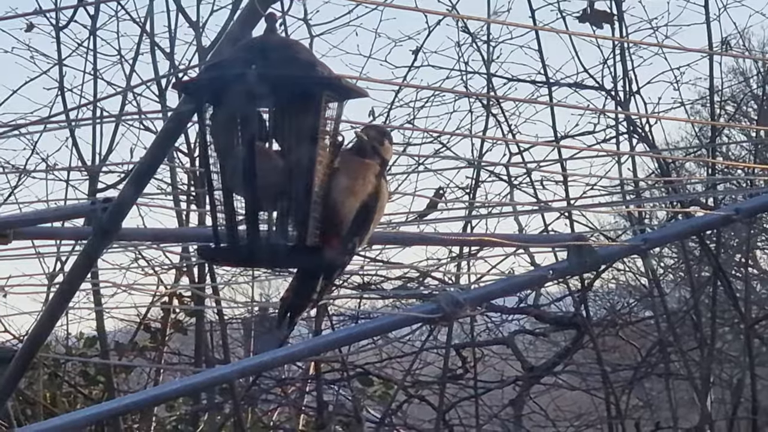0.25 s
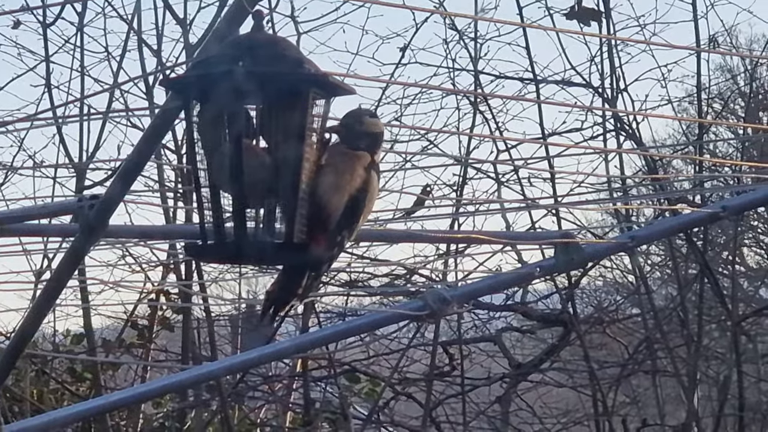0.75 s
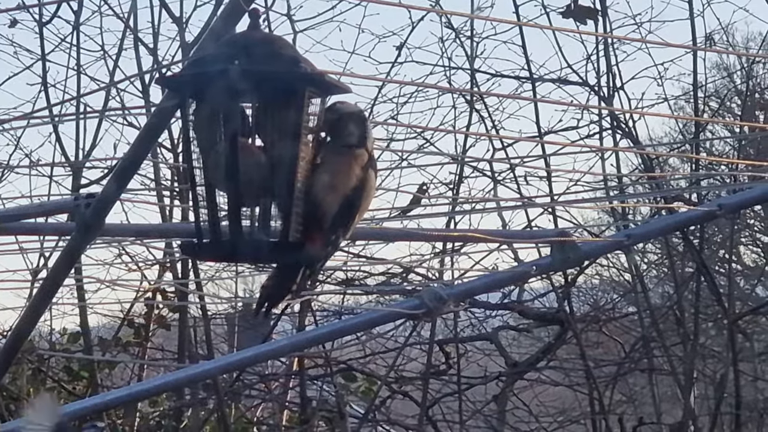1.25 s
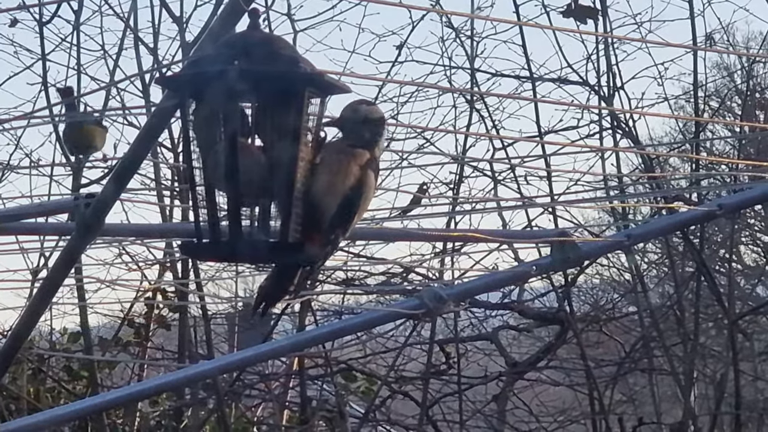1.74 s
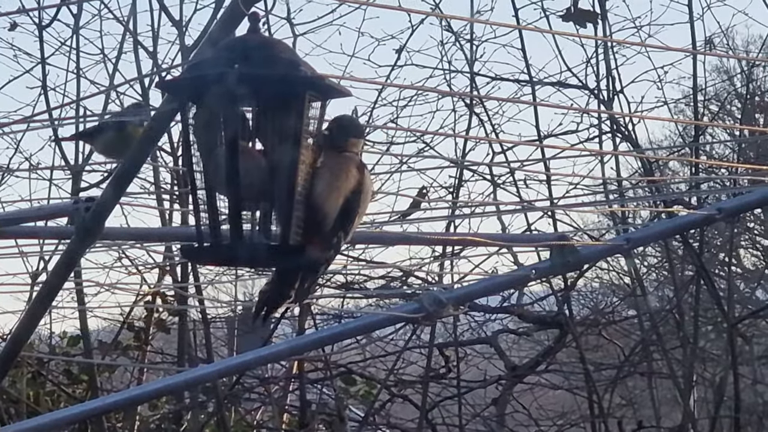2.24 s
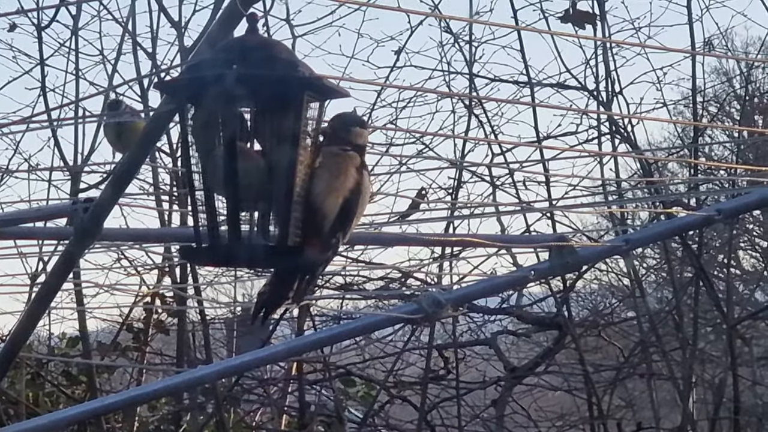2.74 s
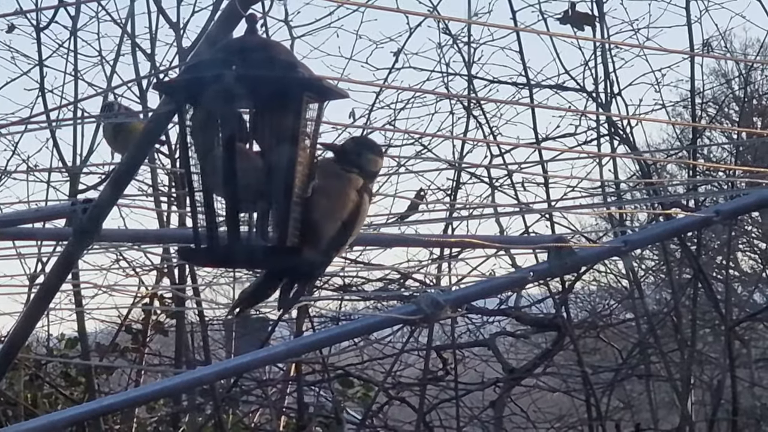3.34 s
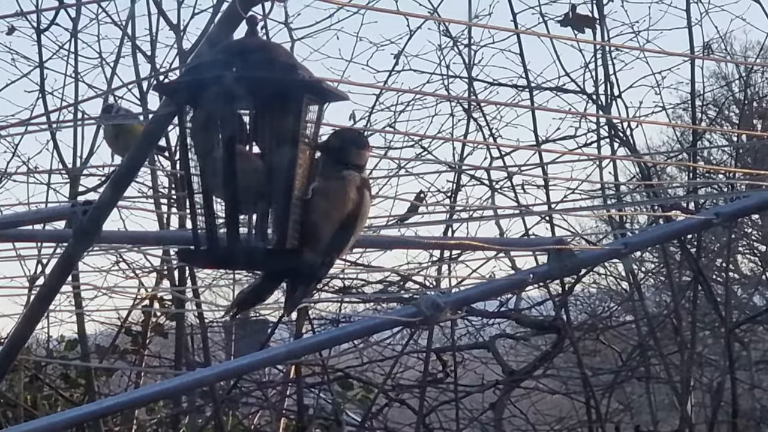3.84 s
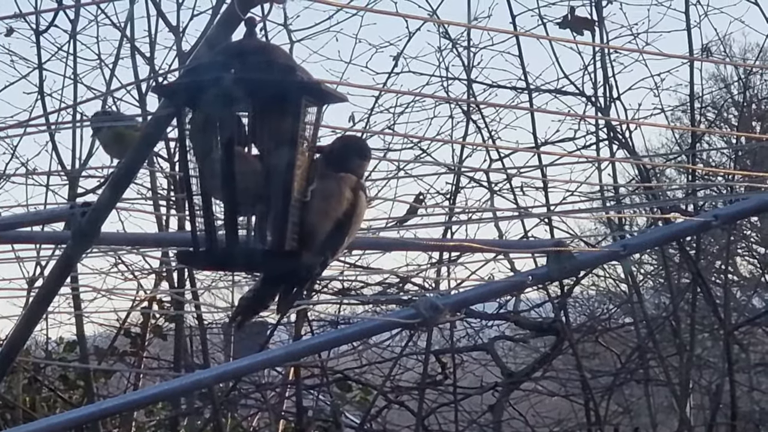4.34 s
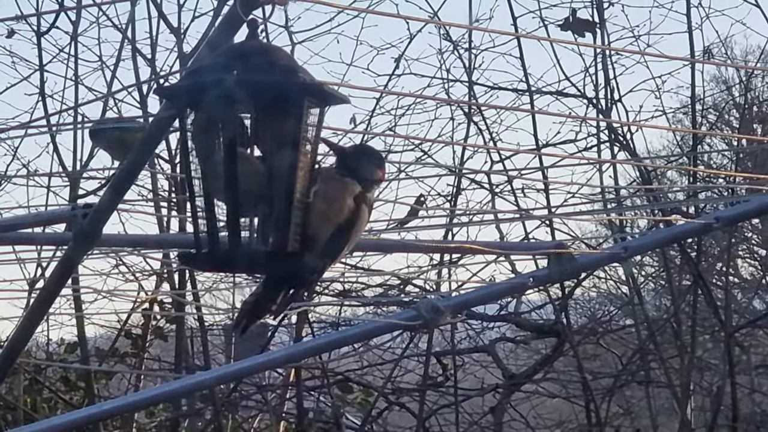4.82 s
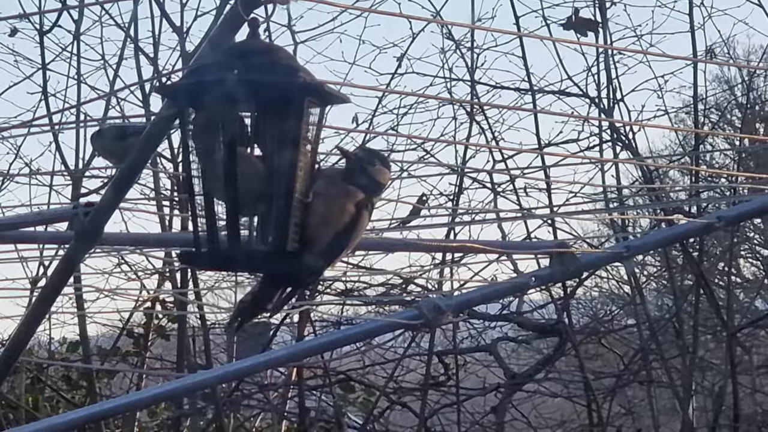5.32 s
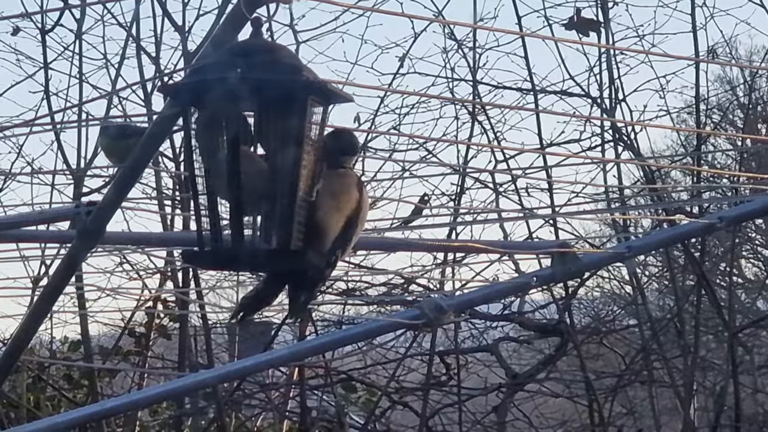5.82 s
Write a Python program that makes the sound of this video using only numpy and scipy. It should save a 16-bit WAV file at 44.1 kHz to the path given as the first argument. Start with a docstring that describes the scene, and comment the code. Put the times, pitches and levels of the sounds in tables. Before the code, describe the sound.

Close, dull pecking thumps lean strongly left, short and irregular, with little clicks and scrapes on contact. After an early burst there are scattered single blows, then a low-ringing pop and a hollow tap with a short echo. Several thuds bunch together late, and a last softer pair ends the scene. The outdoor background is a lumpy low rumble with a gentle garden wash, mostly on the right, and thin microphone hiss.

```python
"""Woodpecker at a hanging feeder

Outdoors, dull thuds reach the left microphone through the body it sits in, many with a faint tick; one pop
and one hollow knock join them. The blows ring decaying modes, and the ticks pass clicks, grains and noise
through resonances. Shaped noise makes a lumpy low rumble, the soft garden wash, mostly louder on the right,
and the hiss of the microphones; very narrow noise makes one faint whine."""
import sys
import numpy as np
from scipy import signal
from scipy.io import wavfile
from scipy.ndimage import uniform_filter1d

SR = 44100
rng = np.random.default_rng(int(sys.argv[2]) if len(sys.argv) > 2 else 0)


def store_pcm(level_fs):
    """Save levels as 16-bit WAV."""
    pcm = np.round(np.clip(level_fs, -1, 1) * 32767).astype(np.int16)
    wavfile.write(sys.argv[1], SR, np.atleast_2d(pcm).T)


N = 267863  # length [samples]

# Spectral shapes of the beds: (frequency [Hz], relative density [dB per Hz])
RUMBLE = [(8, -12.5), (20, 1.5), (55, -4.5), (88, -12.5), (150, -20.5), (270, -32), (500, -60.5)]
WASH = [(150, -25.5), (350, -6.5), (640, -1.7), (1470, -4), (2300, -7), (4700, -13), (5800, -19.5),
        (8000, -29.5), (11000, -60.5)]
MURMUR = [(150, -25.5), (300, 3), (450, -0.4), (750, -7.5), (1200, -36.5)]  # lower part of the wash
HISS = [(5000, -6.5), (9000, -17.5), (10800, -10), (11600, 2), (14500, 1), (16000, 1.5)]
# Stereo balance of the beds: (frequency [Hz], left minus right [dB])
RUMBLE_SIDES = [(20, 8.5), (50, 5), (90, 1), (200, 0)]
WASH_SIDES = [(300, 1.5), (700, -8.5), (1290, -13), (2380, -7.5), (4400, -5), (8000, 4.5)]
# Each bed starts loud and settles: (final level [dB], extra level at the start [dB], settling time [s],
# steady sag [dB per s], left minus right at the start [dB])
RUMBLE_FADE = (-59, 1.5, 4.5, 0.28, -3)
WASH_FADE = (-74.5, 7, 0.23, 0.59, 4)
MURMUR_FADE = (-84, 8.5, 0.67, 0.1, -7)
# First contacts: (time [s], low part [dB], middle part [dB], bright part [dB],
# scrape grains relative to the click [dB], contact time that rounds off the low and middle parts [s])
TICKS = [(0.8043, -60, -53, -94, 0.5, .00075), (0.87, -56, -54, -60, -3, 0.00018),
         (.913, -70, -65, -80.5, -11, 0.00034), (1.88, -59, -60, -68.5, -17, 0.00033),
         (2.257, -61, -62, -70.5, -12, 0.00033), (3.5487, -63, -58, -69, -2, .0004),
         (4.4106, -64, -49, -96, -1, 0.00061), (4.9178, -56, -45.5, -95, -2.5, 0.00068),
         (4.9799, -50.5, -63, -62, 0, 0.00039), (5.052, -56, -45.5, -83, -6, 0.00042),
         (5.8295, -54, -50, -93, -5, 0.00085)]
# Resonances, each passed twice: (frequency [Hz], width of one pass [Hz], relative gain [dB])
TICK_LOW = [(433, 970, 0)]
TICK_MIDDLE = [(1280, 2350, 0)]
TICK_BRIGHT = [(4000, 1300, 1), (5370, 980, 5.5), (6190, 600, 3), (7420, 770, 6.5), (10950, 710, -1.5),
               (13600, 3500, -9.5)]
ECHO_COLOUR = [(450, 300, -5), (1000, 700, -12), (1900, 700, 0)]
WHINE = [(5554, 14, 0)]
# Soft blows: (time [s], blow level [dB], contact time [s], share passed on to the ringing panel [0-1])
THUDS = [(0.8051, -27.5, 0.01, 0.26), (0.869, -14.5, 0.0071, 1), (0.9107, -20.5, 0.0071, 0.6),
         (.935, -31.5, 0.0093, 0), (1.7, -33, 0.01, 0), (1.829, -43.5, 0.011, .1),
         (1.879, -16.5, 0.0072, 0.67), (1.959, -33, 0.018, 0.6), (2.098, -43.5, 0.0068, 0),
         (2.257, -18, 0.0068, .76), (2.283, -31, 0.0088, 0), (2.384, -45, 0.0064, 0.3),
         (2.84, -33, 0.0077, 0.2), (3.2913, -33, 0.013, 0.1), (3.5491, -18.5, 0.007, 0.76),
         (4.4101, -27, 0.0093, 0.15), (4.464, -41.5, 0.015, 0), (4.9174, -22, 0.008, 0.1),
         (4.953, -27.5, 0.0096, 0), (4.9787, -14, 0.0063, 0.92), (5.073, -40, 0.0086, 0),
         (5.8304, -25, 0.008, 0.42), (6.039, -24.5, 0.0089, 0.7)]
# Dying modes: (frequency [Hz], time to fall 60 dB [s], relative left swing, relative right swing);
# a minus sign starts the other way
CASE = [(123, 0.016, -2.5, 0.91)]
PANEL = [(75, 0.094, 0.45, -0.49), (109.8, 0.13, -0.34, -0.17), (129.8, 0.3, -0.048, -0.13)]
JOLT = [(270, .016, .9, 1.2)]  # rattle at first contact
HOLLOW = [(342, 0.016, 0.16, 0.18), (996, 0.034, -0.13, 0.31), (1390, 0.02, -0.026, 0.19),
          (1665, 0.0082, 0.85, 0.8), (1902, .015, -0.18, -0.36), (2670, 0.014, 0.073, 0.013)]

HISS_DB, WHINE_DB = -86.5, -100
SWELL_DB, SWELL_TOP_HZ = 0.3, 2.5  # rms depth and fastest rate of the lumps in the rumble
LOW_PAN_DB, MIDDLE_PAN_DB, BRIGHT_PAN_DB = -15, -13.5, -10  # tick parts, left minus right
# Dull ticks scrape longer than bright ones: level of the bright part, and fall time of the scrape [s]
DULL_DB, DULL_T60, SHARP_DB, SHARP_T60 = -86, 0.06, -74, 0.024
BRIGHT_RISE_S, BRIGHT_LEAD_S = 0.0027, 0.0022  # the bright part starts before the click, peaks just after it
BRIGHT_TAIL_DB, BRIGHT_TAIL_T60 = -16.5, 0.17  # its noisy trail: level relative to the peak, fall time [s]
GIVE_HZ, GIVE_Q = 36.3, 0.79  # slow pushes leak away below this
JOLT_CONTACT_S, JOLT_LEAD_S = 0.0014, 0.00015  # the jolt starts just before the blow builds up
# A blow of HARD_DB rattles at RATTLE_DB; growth is dB of rattle per dB of blow
HARD_DB, RATTLE_DB, RATTLE_GROWTH = -15, -32, 3.3
POP_S, POP_DB, POP_FALL_S = 2.8374, -30, 0.00019
POP_RING_HZ, POP_RING_T60, POP_RING_DB = 146, 0.071, -0.5  # ring level is relative to the pop's step
KNOCK_S, KNOCK_DB = 3.4314, -27.5
ECHO_DB, ECHO_T60 = -6, 0.15  # level relative to the knock, fall time [s]
OPENING_S, EDGE_HZ = 0.062, 15750  # silence before the input opens, upper band limit


def amp(db):
    """Turns dB into linear gain."""
    return 10 ** (np.asarray(db) / 20)


def evened(x):
    """Scales a signal to rms 1."""
    return x / np.sqrt(np.mean(x ** 2) + 1e-20)


def read(points, hz):
    """Reads a spectral curve along a log-frequency axis."""
    f, value = np.transpose(points)
    return np.interp(np.log(hz + 1), np.log(f + 1), value)


def add(mix, s, sound):
    """Mixes a two-channel sound in at time s."""
    part = mix[:, round(s * SR):][:, :sound.shape[1]]
    part += sound[:, :part.shape[1]]


def sides(db):
    """Splits a left-minus-right level difference into two gains."""
    return amp(np.array([db, -db]) / 2)


def ring(modes):
    """Rings two-channel modes, each a sine dying away after one impulse."""
    t = np.arange(SR // 3) / SR
    out = np.zeros((2, len(t)))
    for hz, t60, *swing in modes:
        mode = amp(-60 * t / t60) * np.sin(2 * np.pi * hz * t)
        out += np.outer(swing, mode)
    return out


def strike(response, contact):
    """Drives a response with a smooth blow: a longer contact dulls the sound."""
    blow = np.hanning(round(contact * SR) + 2)[1:-1]
    return signal.fftconvolve(response, blow[None] / blow.sum())[:, :response.shape[1]]


def resonances(x, peaks):
    """Passes a sound twice through each of several resonances side by side."""
    out = np.zeros_like(x)
    for hz, width, db in peaks:
        peak = signal.iirpeak(hz, hz / width, SR)
        once = signal.lfilter(*peak, x)
        out += amp(db) * signal.lfilter(*peak, once)
    return out


def noise(spectrum, balance, patchy_db, size):
    """Shapes unrelated noise in each channel, with level patches over time and frequency."""
    hz = np.fft.rfftfreq(size, 1 / SR)
    frames = 4 * N // size + 5
    real, imaginary, patches = rng.standard_normal((frames, len(hz), 2, 3)).T
    patches = uniform_filter1d(patches, size=5, axis=1)  # blurred over frequency
    patches = evened(uniform_filter1d(patches, size=8, axis=2))  # blurred over time
    level_db = read(spectrum, hz)[:, None] + patchy_db * patches
    bins = (real + 1j * imaginary) * amp(level_db)
    bins /= np.sqrt(np.mean(abs(bins) ** 2))
    bins = bins * sides(read(balance, hz))[:, :, None]
    x = signal.istft(bins, nperseg=size, noverlap=3 * size // 4)[1]
    return evened(x[:, :N])


def settle(final_db, extra_db, settle_s, sag_db, lean_db):
    """Two-channel gain that falls quickly at first, then sags slowly to its final level."""
    t = np.arange(N) / SR
    early = np.exp(-t / settle_s)
    level_db = final_db + extra_db * early + sag_db * (t[-1] - t)
    return amp(level_db) * sides(lean_db * early)


def swells():
    """Slow chance swell of the rumble: sines with random phases, the slower ones deeper."""
    t = np.arange(N) / SR
    drift = np.zeros(N)
    for rate in SWELL_TOP_HZ * np.geomspace(0.1, 1, num=12):
        drift += np.sin(2 * np.pi * (rate * t + rng.random())) / np.sqrt(rate)
    return amp(SWELL_DB * evened(drift))


def background():
    """Noise beds: low rumble, garden wash in two parts, microphone hiss and one faint wavering whine."""
    rumble = settle(*RUMBLE_FADE) * swells() * noise(RUMBLE, RUMBLE_SIDES, patchy_db=-2.5, size=2048)
    wash = settle(*WASH_FADE) * noise(WASH, WASH_SIDES, patchy_db=3.0, size=1024)
    murmur = settle(*MURMUR_FADE) * noise(MURMUR, WASH_SIDES, patchy_db=3.0, size=1024)
    hiss = amp(HISS_DB) * noise(HISS, [(9000, 0.6), (15000, -1.1)], patchy_db=0.0, size=512)
    whine = amp(WHINE_DB) * evened(resonances(rng.standard_normal((2, N)), WHINE))
    return rumble + wash + murmur + hiss + whine


def ticks():
    """First contact: a dull click, a grainy scrape after it and a bright fizz of resonant noise."""
    out, t = np.zeros((2, N)), np.arange(SR // 8) / SR
    click = -1.0 * (t == 0)
    swell = (t / BRIGHT_RISE_S * np.exp(1 - t / BRIGHT_RISE_S)) ** 4
    trail = amp(BRIGHT_TAIL_DB - 60 * t / BRIGHT_TAIL_T60) * (t > BRIGHT_RISE_S)
    for s, low_db, middle_db, bright_db, scrape_db, contact in TICKS:
        hissing, grains = rng.standard_normal((2, 2, len(t)))
        fizz = resonances(hissing * (swell + trail), TICK_BRIGHT)
        fizz /= np.std(resonances(hissing, TICK_BRIGHT))
        add(out, s - BRIGHT_LEAD_S, sides(BRIGHT_PAN_DB)[:, None] * amp(bright_db) * fizz)

        t60 = np.interp(bright_db, [DULL_DB, SHARP_DB], [DULL_T60, SHARP_T60])
        slips = np.sign(grains) * (abs(grains) > 2.4)  # sparse and small
        scrape = amp(scrape_db - 60 * t / t60) * slips
        for db, pan_db, peaks in ((low_db, LOW_PAN_DB, TICK_LOW), (middle_db, MIDDLE_PAN_DB, TICK_MIDDLE)):
            dull = strike(resonances(click + scrape, peaks), contact)
            dull /= abs(resonances(click, peaks)).max()
            add(out, s, sides(pan_db)[:, None] * amp(db) * dull)
    return out


def thuds():
    """A soft blow pushes on the left microphone, jolts the case and sets a panel ringing."""
    out = np.zeros((2, N))
    case, panel = ring(CASE), ring(PANEL)
    jolt = strike(ring(JOLT), JOLT_CONTACT_S)
    for s, db, contact, share in THUDS:
        sound = strike(case + share * panel, contact)
        push = np.hanning(round(contact * SR))
        sound[:, :len(push)] -= np.outer([1, 0.05], push)  # almost all on the left
        add(out, s, amp(db) * sound)
        rattle_db = RATTLE_DB + RATTLE_GROWTH * (db - HARD_DB)
        add(out, s - JOLT_LEAD_S, amp(rattle_db) * jolt)
    w = 2 * np.pi * GIVE_HZ
    leak = signal.bilinear([1, 0, 0], [1, w / GIVE_Q, w ** 2], SR)
    return signal.lfilter(*leak, signal.lfilter(*leak, out))


def pop():
    """Something lets go at the left microphone: a sharp step of pressure with a low ring."""
    out, t = np.zeros((2, N)), np.arange(SR // 4) / SR
    swing = amp(POP_RING_DB - 60 * t / POP_RING_T60) * np.cos(2 * np.pi * POP_RING_HZ * t)
    step = -np.outer([1, 0.02], np.exp(-t / POP_FALL_S) + swing)
    add(out, POP_S, amp(POP_DB) * strike(step, contact=0.00027))
    return out


def knock():
    """A hollow object struck once rings its modes; sparse echoes trail behind it."""
    out, t = np.zeros((2, N)), np.arange(SR // 3) / SR
    struck = ring(HOLLOW) * (1 - np.exp(-t / 0.0014))  # the ring builds up during contact
    signs = rng.choice([-1.0, 1.0], (2, len(t)))
    sparse = rng.random((2, len(t))) < 0.1
    taps = signs * sparse * (t > 0.004) * amp(-60 * t / ECHO_T60)
    echoes = signal.fftconvolve(struck, resonances(taps, ECHO_COLOUR), axes=1)[:, :len(t)]
    echoes *= amp(ECHO_DB) * np.linalg.norm(struck) / np.linalg.norm(echoes)
    add(out, KNOCK_S, amp(KNOCK_DB) * (struck + echoes))
    return out


def scene():
    """Sums all sources."""
    return background() + ticks() + thuds() + pop() + knock()


def record(dry):
    """Opens the input a moment late with a short fade, then cuts the top of the band."""
    t = np.arange(N) / SR
    opened = dry * np.clip((t - OPENING_S) / 0.0096, 0, 1)
    band = signal.firwin(511, EDGE_HZ, window=("kaiser", 9), fs=SR)
    return signal.oaconvolve(opened, band[None], "same")


dry = scene()
out = record(dry)
store_pcm(out)
```